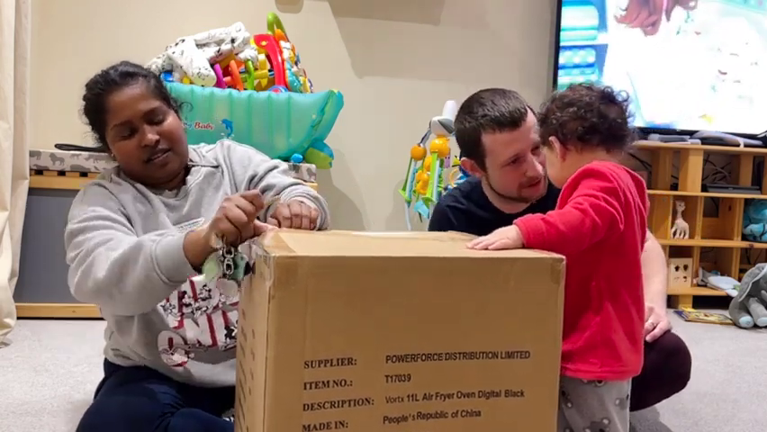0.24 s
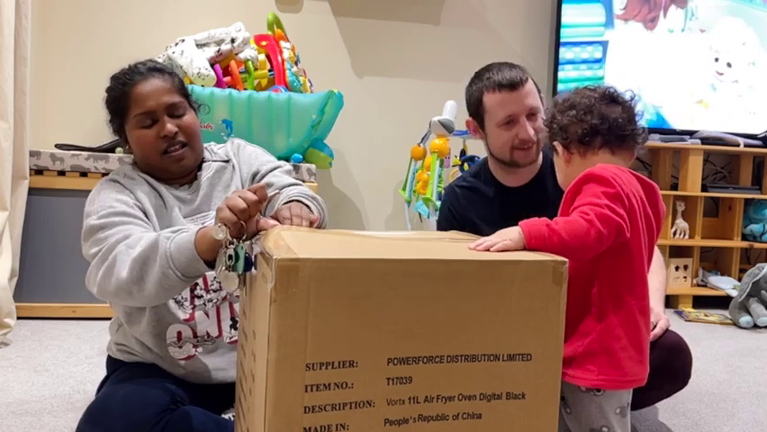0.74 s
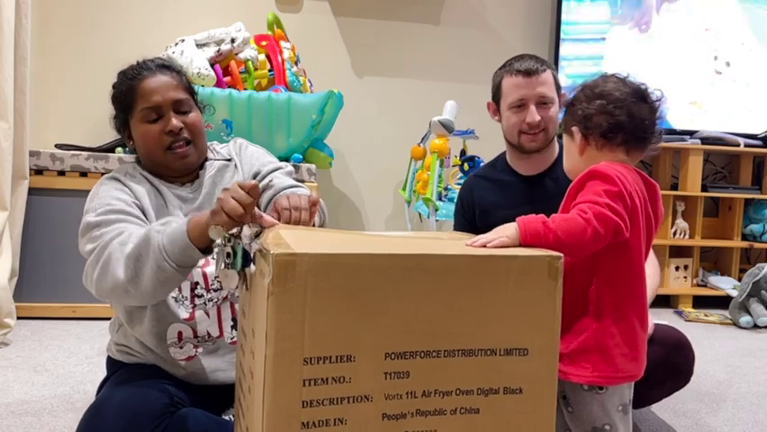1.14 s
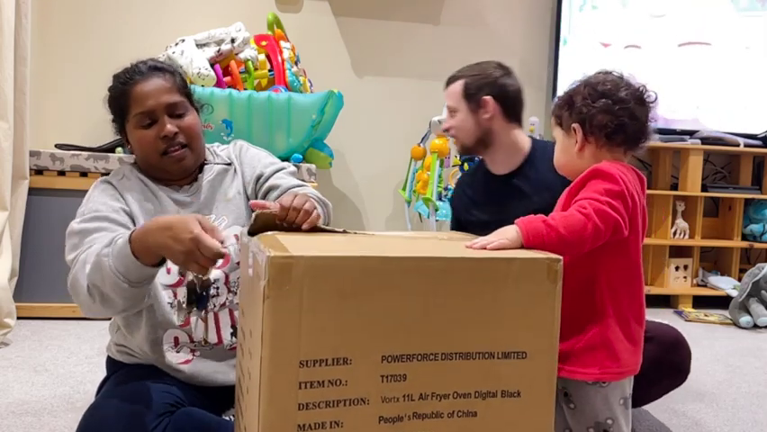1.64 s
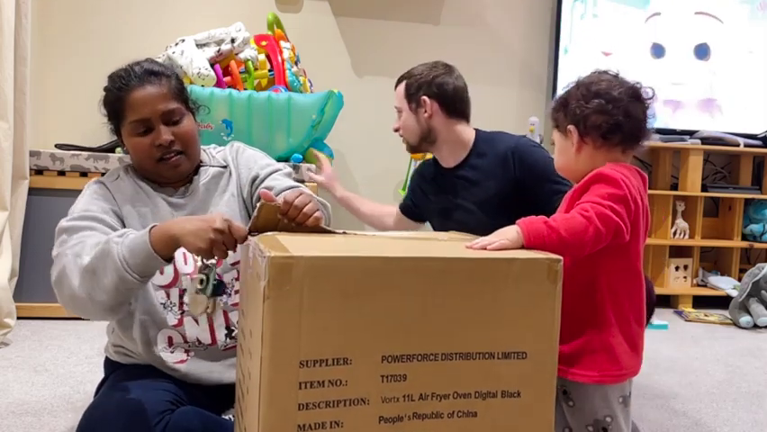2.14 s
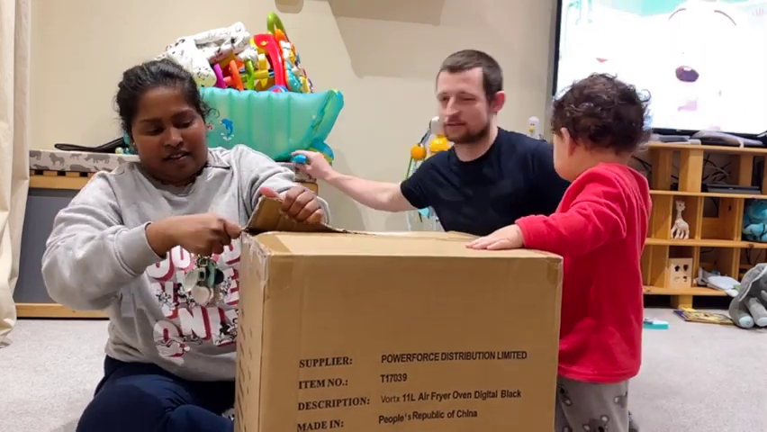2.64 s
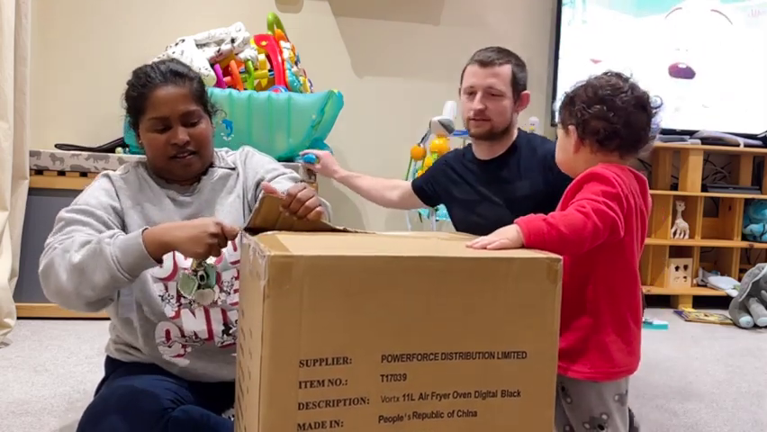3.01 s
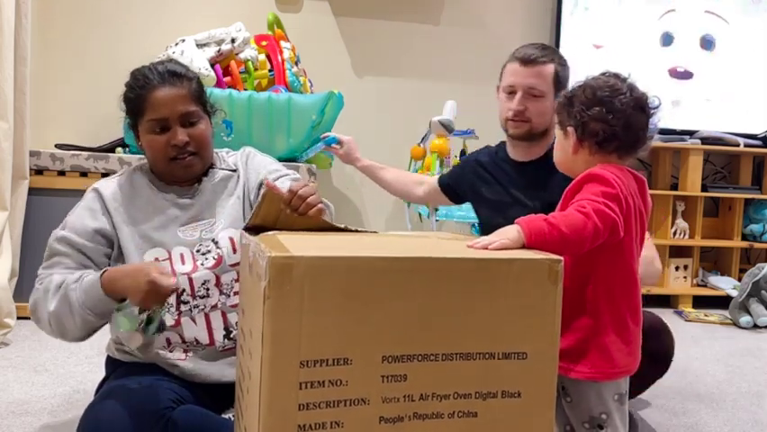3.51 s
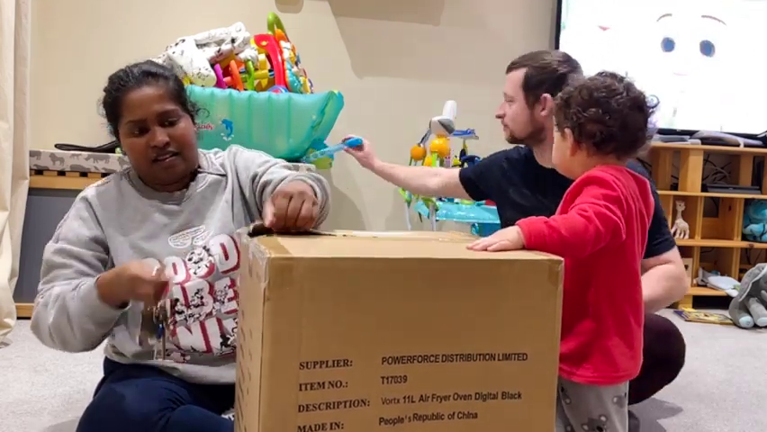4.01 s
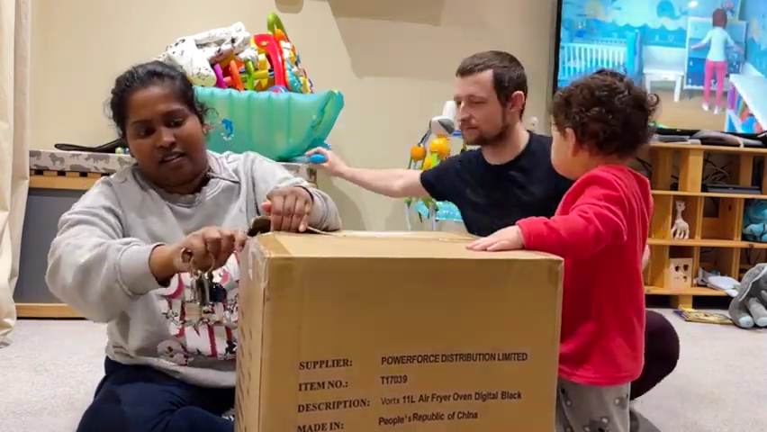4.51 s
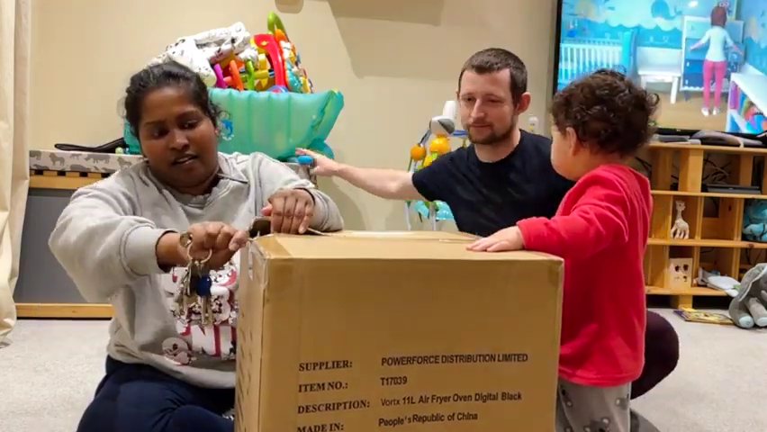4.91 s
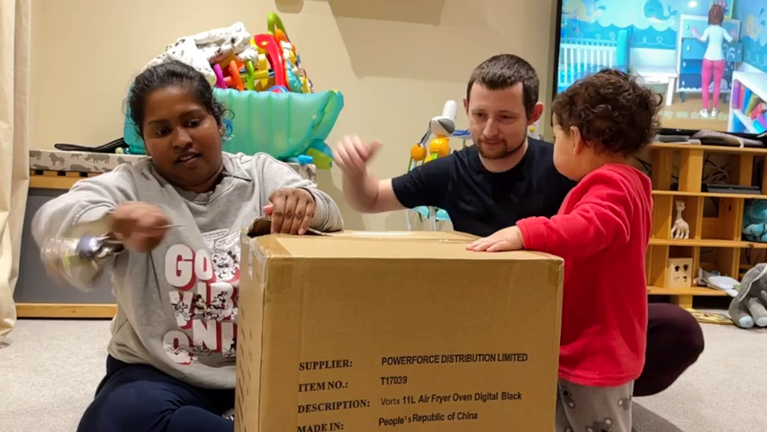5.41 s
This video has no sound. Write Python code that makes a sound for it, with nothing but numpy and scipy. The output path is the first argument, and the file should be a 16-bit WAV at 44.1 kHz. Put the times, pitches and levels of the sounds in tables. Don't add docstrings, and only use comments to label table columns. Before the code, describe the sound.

A close, mono-like indoor sound of a cardboard box being opened with a key. At 0 s a hard hollow thump, a scrape and a strong jingle, then small clinks and tape snaps up to 0.3 s. A quieter gap holds faint rustle and brushing. From about 0.9 to 1.5 s come short gritty saw strokes, with a sharp card pop near 1.2 and a snap at 1.4. Two heavy knocks fall around 1.9 s, followed by uneven scraping and popping until 2.9. At 3.15 s a loud bite and short knock lead to the brightest key jangle, peaking around 3.4 and fading by 3.7. Softer raspy drags and a gentle knock follow at 4.0-4.2, then sparse faint clinks and rustle. From 5.1 s sawing resumes, with crisp snaps and ringing keys at 5.4-5.65. Tiny glue crackles, short room echo and a low hush lie beneath.

```python
import sys
import numpy as np
from scipy import signal
from scipy.fft import rfft, irfft, next_fast_len
from scipy.io import wavfile
from scipy.ndimage import uniform_filter1d, map_coordinates

SR = 44100
rng = np.random.default_rng(int(sys.argv[2]) if len(sys.argv) > 2 else 0)


def to_wav(sig):
    pcm = np.clip(np.atleast_2d(sig), -1, 1) * 32767
    pcm = np.round(pcm).astype(np.int16)
    wavfile.write(sys.argv[1], SR, pcm.T)


def voltage_ratio(level):
    return 10 ** (np.asarray(level, float) / 20)


N = 249457


def unit(x):
    return x / np.sqrt(np.mean(x ** 2) + 1e-20)


def along(points, hz):
    f, v = np.transpose(points)
    return np.interp(np.log(hz + 1), np.log(f + 1), v)


def curves(rows):
    s, *cols = np.transpose(rows)
    return [np.interp(np.arange(N) / SR, s, c) for c in cols]


def wobble(rate):
    knots = rng.standard_normal(int(N * rate / SR) + 4)
    coarse = map_coordinates(knots, [np.arange(0, N + 64, 64) * rate / SR])
    return np.interp(np.arange(N) / 64, np.arange(len(coarse)), coarse)


def filtered(x, response):
    m = next_fast_len(N + SR // 2)
    return irfft(rfft(x, m) * response(np.fft.rfftfreq(m, 1 / SR)), m)[:N]


def peak(f, hz, width):
    return 1j * f * width / (hz * hz - f * f + 1j * f * width)


def grit(per_second, spread_db):
    size = voltage_ratio(spread_db * np.minimum(rng.exponential(size=N), 3.5))
    slips = (rng.random(N) < per_second / SR) * size
    return unit(unit(slips * rng.choice([-1, 1], N)) + 0.5 * rng.standard_normal(N))


def ring(t, hz, db, t60, attack=0.000096):
    return voltage_ratio(db - 60 * t / t60) * np.sin(2 * np.pi * hz * t) * (1 - np.exp(-t / attack))


def add(track, s, sound):
    track[max(round(s * SR), 0):][:len(sound)] += sound


# pitch_hz, width_hz, level_db
PANEL = [(200, 360, 0.5), (335, 320, 1), (515, 410, 7.5), (893, 454, 9.5), (1250, 377, 8.5),
         (2050, 696, 12)]
# pitch_hz, level_db
FIZZ = [(4300, -25), (5200, -2), (6200, 0), (7500, -4), (10000, -6), (11200, -12), (15500, -17)]


def cardboard(grip=1):
    bite = voltage_ratio(2.8 * wobble(60) + grip * 4.04 * wobble(21.954))
    slips = bite * grit(1000, 3.77 * np.sqrt(grip))

    def modes(rows):
        def body(f):
            damping = 1 / (1 + 1j * f / 2600) ** 2
            return damping * sum(voltage_ratio(db) * peak(f, hz, width) ** 2 for hz, width, db in rows)
        return unit(filtered(slips, body))

    rasp = filtered(bite * grit(1500, 4.5), lambda f: peak(f, 3646, 1930) ** 3)
    hiss = filtered(bite * grit(3000, 2.5), lambda f: voltage_ratio(along(FIZZ, f)))
    return slips, modes(PANEL[:3]), modes(PANEL[3:]), unit(rasp), unit(hiss)


# start_s, length_s, level_db, pitch_hz, rasp_db
STROKES = [(0.71, 0.06, -40.5, 1430, 4), (1.159, 0.058, -19.5, 946, -12), (1.39, 0.07, -19, 1570, -6),
           (1.815, 0.068, -19.5, 860, -37), (1.833, 0.18, -25.5, 2160, -11.5), (2.156, 0.1, -27, 910, -6.5),
           (2.234, 0.095, -23.5, 930, -7.5), (2.372, 0.095, -28, 1750, -11), (2.408, 0.078, -17, 2050, -16),
           (2.602, 0.09, -20, 1710, -13), (2.766, 0.047, -24.5, 1490, -11), (2.858, 0.064, -29, 1250, -9),
           (3.057, 0.018, -20.5, 746, -6.5), (3.078, 0.024, -29, 940, -11), (3.155, 0.025, -10.5, 623, -19),
           (3.16, 0.0098, -8.5, 1110, -40), (3.163, 0.072, -23.5, 1030, 4.5),
           (5.112, 0.089, -25.5, 1670, -7), (5.19, 0.062, -17.5, 1073, -10),
           (5.237, 0.065, -25.5, 1690, 0.5)]
# start_s, length_s, level_db, pitch_hz, rasp_db
SKIMS = [
    (0, 0.033, -20.5, 980, -12),
    (0.022, 0.088, -27.5, 1070, 1),
    (0.386, 0.067, -45.5, 1790, 2),
    (1.112, 0.065, -21.5, 1590, -15),
    (2.655, 0.021, -17.5, 1190, -12),
    (2.742, 0.049, -13.5, 1250, -19.5),
    (3.979, .12, -29.5, 1700, -1.5),
    (4.126, .066, -21.5, 2200, -7),
    (4.16, .13, -29, 1790, -2),
]


def saw():
    slips, box, flap, rasp, hiss = cardboard()
    out = np.zeros(N + SR)
    strokes = [(*row, -1.5) for row in STROKES] + [(*row, -13) for row in SKIMS]
    for s, length, db, hz, rasp_db, box_db in strokes:
        part = slice(max(round(s * SR), 0), round((s + length) * SR))
        swell = np.sin(np.linspace(0, np.pi, len(slips[part]))) ** 1.3
        band = signal.iirpeak(hz, 3, SR)
        pitch = unit(signal.lfilter(*band, signal.lfilter(*band, slips[part])))
        body = 0.7 * pitch + 0.59 * flap[part] + voltage_ratio(box_db) * box[part]
        edge = voltage_ratio(rasp_db) * (rasp[part] + 0.5 * hiss[part])
        add(out, s, voltage_ratio(db - 2) * swell * (body + edge))
    return out[:N]


# start_s, peak_db, panel_hz, edge_db
SNAPS = [(.226, -14, 2700, -17), (.252, -21.5, 1850, 0), (.988, -23, 2320, -11), (1.132, -18.5, 1520, -36),
         (1.138, -17.5, 980, -17), (1.356, -39, 1120, 5), (1.399, -8.5, 1940, -22), (1.991, -20, 970, -20),
         (2.021, -21, 1970, -2.5), (2.209, -39, 2400, 19), (2.53, -32.5, 2420, -6), (2.642, -11, 1250, -35),
         (2.988, -52, 2600, 18), (3.007, -41, 2640, 22), (3.907, -33.5, 1940, 11.5),
         (5.477, -25.5, 1110, 15), (4.45, -37.5, 765, -19), (4.715, -18.5, 2920, -29),
         (4.792, -37, 1020, 4), (5.123, -19.5, 920, 1.5), (5.434, -14.5, 2400, 14.5),
         (5.613, -13.5, 2780, 7.5)]
# start_s, peak_db, panel_hz, edge_db
POPS = [(0.012, -19.5, 840, 8.5), (0.186, -31, 1720, -1), (0.268, -26, 1880, -17), (.595, -29, 2050, -3),
        (.695, -36, 2050, 9), (0.928, -31, 2100, -19), (1.044, -24.5, 2100, -8), (1.172, -4.5, 1580, -38),
        (1.39, -11.5, 1100, -3.5), (1.435, -26, 1580, 5), (1.475, -23.5, 1500, -5),
        (1.575, -21.5, 2480, -39), (1.629, -22.5, 1850, -8), (1.732, -30.5, 765, -30),
        (1.969, -17.5, 2040, -5), (2.117, -28, 2030, 7), (2.134, -28.5, 780, 5), (2.176, -16.5, 1390, -21),
        (2.182, -19, 785, -2), (2.399, -9.5, 2210, -25), (2.878, -21, 1160, -8), (3.192, -10.5, 1800, -18),
        (4.23, -26, 1520, 5), (5.391, -20, 1630, 2), (4.386, -34.5, 695, 7)]


def snaps():
    out, t = np.zeros(N + SR), np.arange(SR // 16) / SR
    breaks = [(*row, 13.5) for row in SNAPS] + [(*row, -16) for row in POPS]
    for s, db, hz, edge_db, tape_db in breaks:
        panel = ring(t, hz, db + 9.5, 9 / hz)
        panel += ring(t, hz, db - 34, 45 / hz, attack=0.0066)
        panel += ring(t, hz * rng.uniform(0.48, 0.825), db - 6, 0.014)
        panel += ring(t, hz * rng.uniform(1.41, 1.61), db - 1, 0.0049)
        tape = ring(t, rng.normal(3530, 220), db + tape_db - 9.5, 0.0085, attack=0.0001)
        spit = np.diff(uniform_filter1d(rng.standard_normal(len(t) + 1), size=3)) * 2
        edge = voltage_ratio(db + edge_db + 2.5 - 60 * t / 0.0045) * spit
        tick = voltage_ratio(db - 60 * t / 0.0026) * uniform_filter1d(rng.standard_normal(len(t)), size=7)
        add(out, s, panel + tape + edge + tick)
    return filtered(out[:N], lambda f: (1j * f / (300 + 1j * f)) ** 2)


# start_s, peak_db, push_hz, t60_s
THUMPS = [
    (0.0312, 8, 510, 0.083),
    (0.252, -26.5, 200, 0.21),
    (1.8854, -1, 393, 0.096),
    (1.9158, 6, 298, 0.05),
    (3.1637, 1.5, 660, 0.035),
    (3.405, -27, 307, 0.045),
    (4.199, -17.5, 320, .06),
    (4.38, -36, 520, .04),
]
# pitch_hz, level_db, share of the thump's t60
BOX = [(183.3, -10.5, 1.72), (303.7, -14.5, 2.13), (404.4, -27, 0.27), (575, -18, 0.23), (883, -3, 0.28)]


def thumps():
    out, t = np.zeros(N + SR), np.arange(SR // 3) / SR
    for s, db, hz, t60 in THUMPS:
        sound = voltage_ratio(db - 2) * np.sin(2 * np.pi * hz * t) * np.exp(-(t * hz / 1.015) ** 3)
        for mode_hz, level, share in BOX:
            mode_hz, mode_db = mode_hz * rng.normal(1, 0.04), db - 11 + level + rng.normal(0, 2)
            sound += ring(t, mode_hz, mode_db, t60 * share, attack=0.004)
        add(out, s, sound)
    return filtered(out[:N], lambda f: (1j * f / (90 + 1j * f)) ** 2)


# pitch_hz, level_db, t60_s
KEYS = [(3110, 2.5, 0.034), (3990, 0.5, 0.049), (5140, -2, 0.15), (5780, 11, 0.05), (5940, 13.5, 0.014),
        (6790, -1, 0.026), (7770, -13, 0.085), (8400, 1.5, 0.049), (9150, -10, 0.019), (10300, -20.5, 0.04),
        (12700, -3, 0.041), (14000, -11, 0.11), (14250, -9, 0.081), (14770, -34, 0.091)]
# start_s, peak_db, low_key_hz, long_keys_db
CLINKS = [(0.071, -17, 3980, 11.5), (0.1259, -20, 4000, 2), (.1456, -14.5, 4000, -3), (1.276, -18, 3030, 0),
          (1.4148, -16, 3450, -13), (1.975, -14, 10300, -18), (3.1906, -14, 5060, 16),
          (3.2493, -9, 3110, -6), (3.277, -11, 3110, -12), (3.312, -10.5, 3000, -7),
          (3.3412, -2, 3110, -0.5), (3.3748, -4, 5470, 10.5), (3.3844, -3, 5780, -20),
          (3.4055, 5.5, 5940, -14), (3.445, -7, 5200, 10), (3.456, -0.5, 3990, 5),
          (3.6616, -18.5, 3020, 9.5), (4.5994, -21, 3820, 6), (4.7496, -36, 3220, 4),
          (4.9716, -31.5, 3020, 10), (5.2682, -14.5, 5500, -10), (5.376, -19.5, 3980, 3),
          (5.3905, -12, 4010, 8.5), (5.4395, -9, 7400, -15), (5.4504, -12, 6760, -7),
          (5.478, -7.5, 5370, -5), (5.594, -17.5, 5100, -7), (5.6162, -10, 5800, -16),
          (5.6361, -9, 5950, 13)]
# start_s, peak_db, low_key_hz
TOUCHES = [
    (0.2916, -24, 5940),
    (1.2378, -24, 3100),
    (1.9264, -24.5, 2910),
    (3.1752, -25, 6010),
    (3.505, -25, 3050),
    (3.584, -24, 5780),
    (3.6014, -23, 5070),
    (4.561, -24.5, 4060),
    (4.577, -23.5, 3980),
]


def clinks():
    out, t = np.zeros(N + SR), np.arange(SR // 6) / SR
    hz, level, t60 = np.transpose(KEYS)[..., None]
    for s, db, low_hz, low_db in CLINKS + [(*row, 1) for row in TOUCHES]:
        high_hz = rng.choice(hz[hz > 8000])
        low_key = voltage_ratio(-300 * abs(np.log(hz / low_hz)))
        high_key = 0.22 * voltage_ratio(-300 * abs(np.log(hz / high_hz)))
        bunch = 0.1 * voltage_ratio(level + rng.normal(0, 2.7, hz.shape))
        share = (bunch + np.maximum(low_key, high_key)) * np.where(hz < 4500, voltage_ratio(low_db), 1)
        key_hz, key_t60 = hz * rng.normal(1, 0.0069, hz.shape), t60 * rng.uniform(0.31, 1.01, hz.shape)
        pair = ring(t, key_hz, db - 4, key_t60, attack=0.00018)
        odd_hz = 2900 * 5.3 ** rng.random((16, 1))
        odd_db = db - 14.5 + rng.normal(0, 6.25, odd_hz.shape)
        clatter = ring(t, odd_hz, odd_db, rng.uniform(0.0091, 0.025, odd_hz.shape), attack=0.00094)
        crack = voltage_ratio(db - 19 - 60 * t / 0.022) * np.diff(rng.standard_normal(len(t) + 1))
        add(out, s, (share * pair).sum(0) + clatter.sum(0) + crack)
    return out[:N]


# loudest_s, rise_s, fall_s, level_db, long_over_short_db
SHAKES = [
    (0.005, .05, 0.14, -22.5, -3),
    (.298, 0.16, 0.036, -38.5, 4.5),
    (1.283, .1, 0.068, -33, 1.5),
    (1.87, 0.033, 0.23, -46, 18.5),
    (3.442, 0.16, 0.055, -16, 3.5),
    (3.684, 0.16, 0.062, -36, 5.5),
    (4.559, .01, 0.092, -40, -0.5),
    (5.25, .012, 0.16, -35.5, -3),
    (5.399, 0.013, 0.11, -21.5, 3),
    (5.655, 0.19, .05, -28, 1.5),
]


def jingle():
    t = np.arange(N) / SR
    gains = np.zeros((3, N))
    for s, rise, fall, db, tilt_db in SHAKES:
        swing = -20 * np.maximum((s - t) / rise, (t - s) / fall)
        for gain, lean in zip(gains, (1, -0.3, -0.6)):
            gain += voltage_ratio(db + lean * tilt_db + swing)
    groups, taps = np.zeros((3, N)), grit(250, 1.9)
    for hz, db, t60 in KEYS:
        song = signal.lfilter(*signal.iirpeak(hz, hz * t60 / 3, SR), np.roll(taps, rng.integers(N)))
        groups[np.searchsorted([4500, 6400], hz)] += voltage_ratio(db / 2 + 4.5 * wobble(28)) * unit(song)
    glint_gain = (voltage_ratio(hiss_level() - 23) + 0.6 * pushes()) * voltage_ratio(7 * np.minimum(wobble(12), 1.6))
    out = glint_gain * unit(np.diff(groups[2], 3, prepend=[0, 0, 0]))
    clatter_bands = [(3400, 1750, 5), (5600, 1300, 5), (11500, 27000, 3.2)]  # Hz, width Hz, spread dB
    for gain, group, (hz, width, spread) in zip(gains, groups, clatter_bands):
        clatter = filtered(grit(900, spread), lambda f: peak(f, hz, width) ** 2)
        out += gain * (0.72 * unit(group) + 0.42 * unit(clatter))
    return out


# start_s, length_s, pitch_hz, level_db
SONGS = [(0.068, 0.13, 3990, -40.5), (.265, .03, 12700, -44), (1.277, 0.063, 5780, -46),
         (1.735, 0.03, 740, -36), (1.827, 0.055, 910, -29), (1.932, .038, 12700, -43),
         (3.198, 0.06, 12700, -36), (3.247, 0.086, 3110, -28.5), (3.385, 0.026, 5780, -18),
         (3.407, 0.038, 8400, -18.5), (3.41, 0.027, 14770, -20), (3.451, 0.025, 3990, -11),
         (5.313, 0.068, 3990, -41), (5.376, 0.03, 14250, -30), (5.44, 0.112, 3990, -27.5),
         (5.45, 0.047, 14770, -28), (5.488, 0.072, 8400, -35), (5.473, 0.082, 9150, -37),
         (5.468, 0.084, 5060, -23), (5.48, 0.067, 5780, -22), (5.492, 0.055, 3070, -35)]


def songs():
    out, flutter, drift = np.zeros(N + SR), voltage_ratio(5.5 * wobble(90)), wobble(130)
    for s, length, hz, db in SONGS:
        part = slice(round(s * SR), round((s + length) * SR))
        t = np.arange(part.stop - part.start) / SR
        hold = np.minimum(1, np.minimum(t / 0.0017, (t[-1] - t) / 0.028)) * voltage_ratio(-6 * t / length)
        shift = round(hz)
        note = np.sin(2 * np.pi * hz * t + 0.6 * np.roll(drift, shift)[part])
        add(out, s, voltage_ratio(db + 5) * hold * np.roll(flutter, shift)[part] * note)
    return out[:N]


def pushes():
    t, heave = np.arange(N) / SR, np.zeros(N)
    for s, length, db, *_ in STROKES:
        lag = np.maximum(t - s, 0) / (length + 0.059)
        heave += voltage_ratio(db - 32) * lag * np.exp(-2 * lag)
    return heave


# start_s, movement_db, box_weight_db
RUSTLE = [(0.0, -25, 2), (0.11, -36, -9), (0.3, -48.5, -4), (0.93, -48, -17), (1.35, -40.5, -10),
          (1.48, -39, -10), (1.78, -39.5, -12), (2.05, -36, -5), (2.33, -37.5, -0.5), (2.47, -47, -10),
          (2.84, -46, -2), (3.13, -50, 5.5), (3.43, -43.5, -10), (3.75, -38, -4), (4.65, -49.5, 0),
          (5.06, -47.5, 2.5), (5.37, -40.5, -3), (5.66, -39, -11)]


def hiss_level():
    movement_db = curves(RUSTLE)[0]
    return -55 + 0.23 * (movement_db - np.median(movement_db))


def rustle():
    _, box, flap, rasp, hiss = cardboard(grip=0.45)
    rustle_db, weight_db = curves(RUSTLE)
    rumble = filtered(rng.standard_normal(N), lambda f: peak(f, 88, 74) + 2.1 * peak(f, 35, 28))
    lumps = voltage_ratio(2.5 * wobble(9))
    low = voltage_ratio(rustle_db + weight_db) * box + (voltage_ratio(-60.5) + pushes()) * unit(lumps * rumble)
    high = voltage_ratio(rustle_db) * (0.63 * flap + 0.5 * rasp) + voltage_ratio(hiss_level()) * hiss
    return low + voltage_ratio(1.6 * wobble(19)) * high


def crackle():
    when, pitch, size = rng.random((3, 260))
    t, out, level_db = np.arange(SR // 200) / SR, np.zeros(N + SR), hiss_level()
    for s, hz, db in zip(when * (N - 1) / SR, 1800 * 7 ** pitch, -5 * np.log(size + 0.05)):
        fade = voltage_ratio(level_db[int(s * SR)] + db + 12 - 60 * t / 0.003)
        noise = uniform_filter1d(rng.standard_normal(len(t)), size=4)
        add(out, s, fade * noise * np.sin(2 * np.pi * hz * t))
    return out[:N]


# pitch_hz, t60_s
ROOM = [(200, 0.23), (1500, 0.24), (5000, 0.05), (14000, 0.15)]


def room(x):
    out, step = np.zeros(N + 2 * SR), SR // 4
    for a in range(0, N, step):
        hz, t, z = signal.stft(rng.standard_normal(SR // 3), SR, nperseg=256)
        tail = signal.istft(z * voltage_ratio(-60 * t / along(ROOM, hz)[:, None]), SR, nperseg=256)[1]
        add(out, a / SR + 0.003, signal.fftconvolve(x[a:a + step], tail / np.linalg.norm(tail)))
    return out[:N]


# pitch_hz, level_db (per Hz)
AIR = [(15, -36), (30, -1.5), (253, 7), (1380, 9), (2640, 5), (3840, -4), (6500, -20), (15600, -34)]


def air():
    hush = filtered(rng.standard_normal(N), lambda f: voltage_ratio(along(AIR, f)))
    return voltage_ratio(-50.5 + 0.5 * wobble(2.7)) * unit(hush)


def scene():
    near = saw() + snaps() + thumps() + clinks() + jingle() + songs() + rustle() + crackle()
    return (near + voltage_ratio(-12) * room(near) + air())[None]


def low_pass(x):
    return signal.sosfilt(signal.butter(12, 15740, fs=SR, output="sos"), x)


def record(dry):
    x = filtered(dry[0], lambda f: 1 - 0.73 * peak(f, 4490, 890))
    x = x / (1 + abs(x) ** 8) ** (1 / 8)
    mix = filtered(x, lambda f: f < 15750)[None]
    return low_pass(mix)


dry = scene()
out = record(dry)
to_wav(out)
```